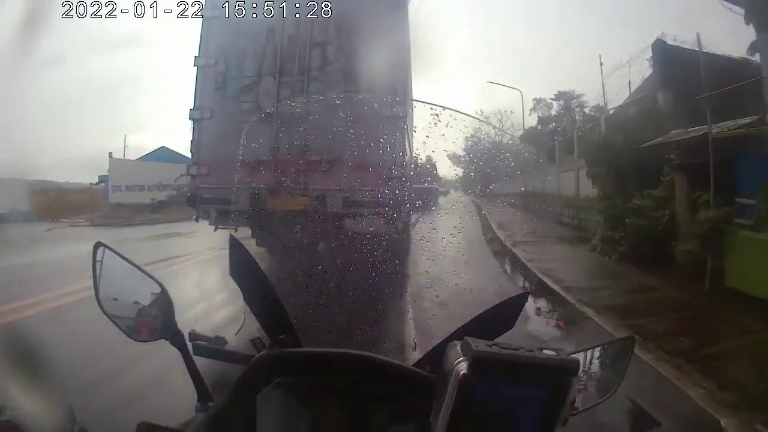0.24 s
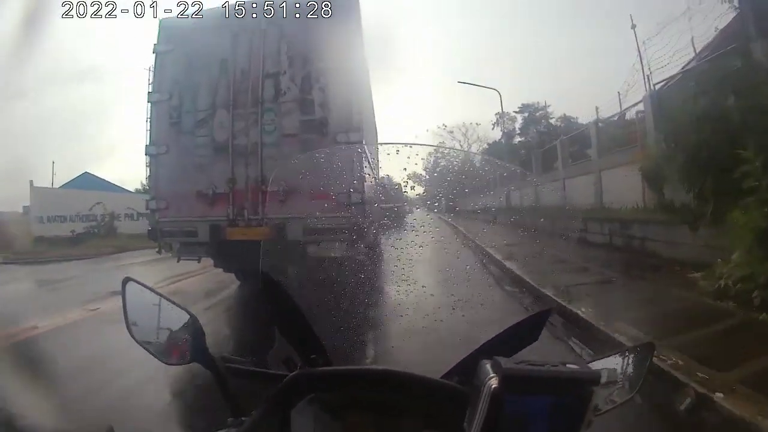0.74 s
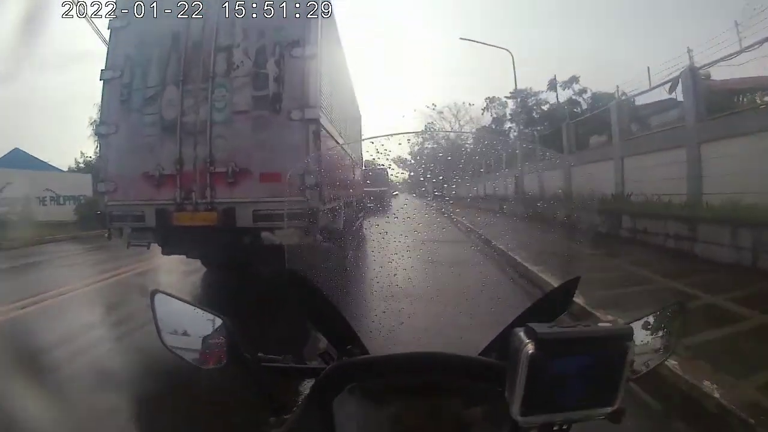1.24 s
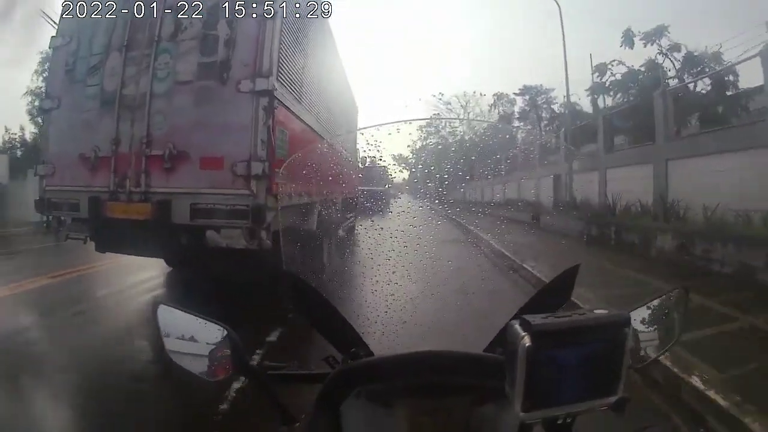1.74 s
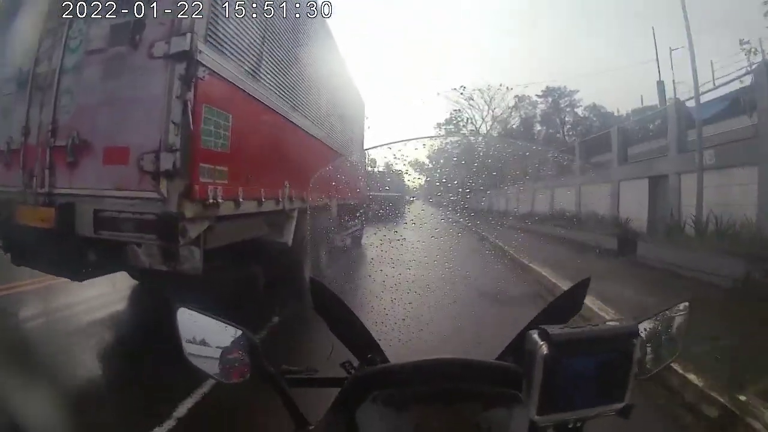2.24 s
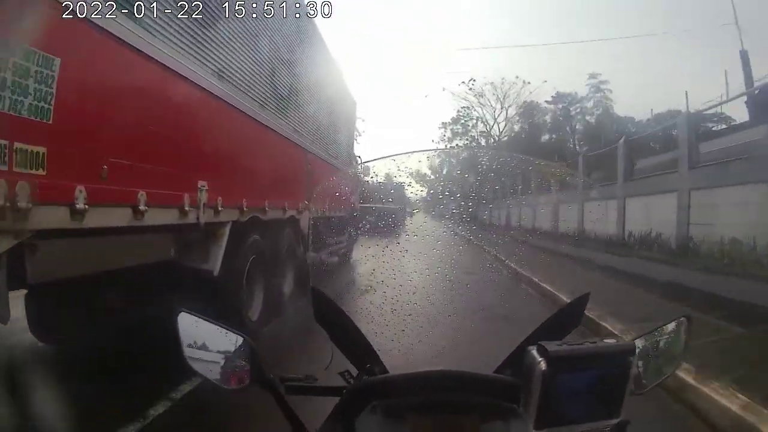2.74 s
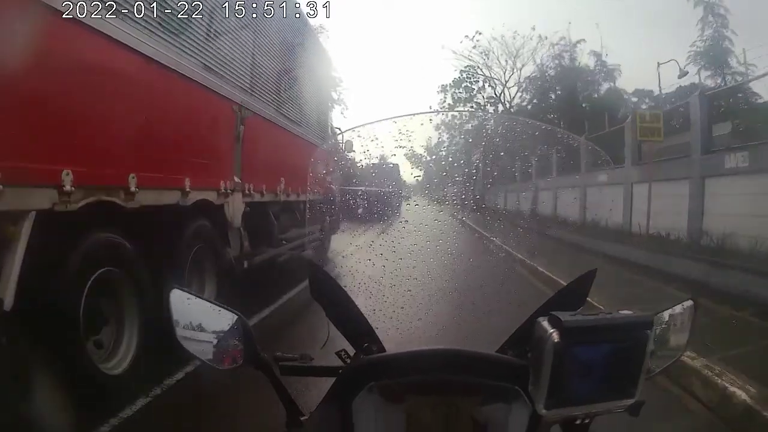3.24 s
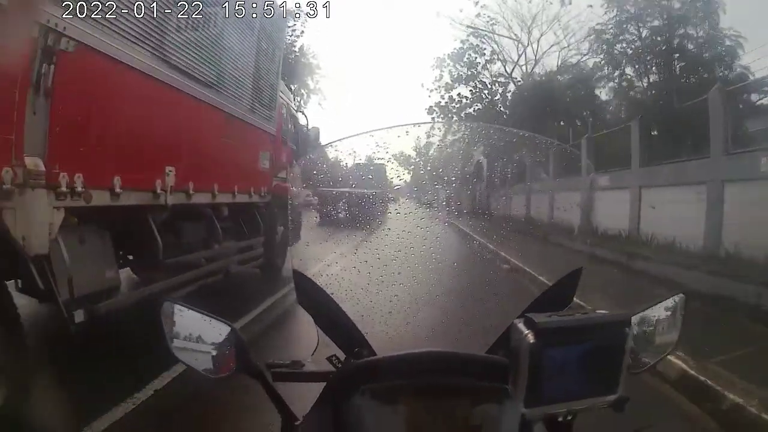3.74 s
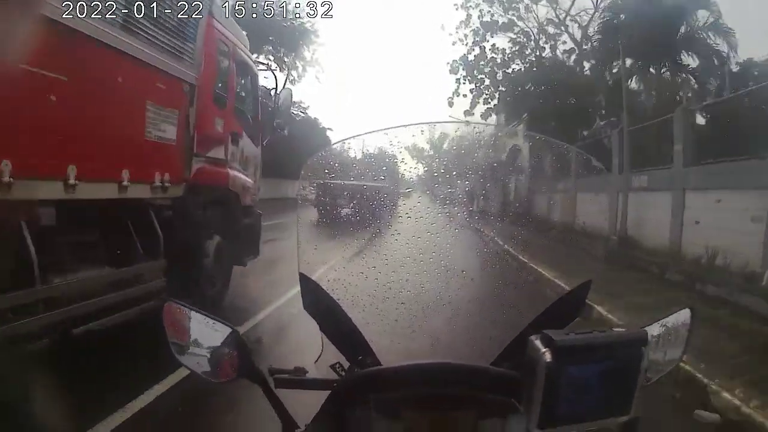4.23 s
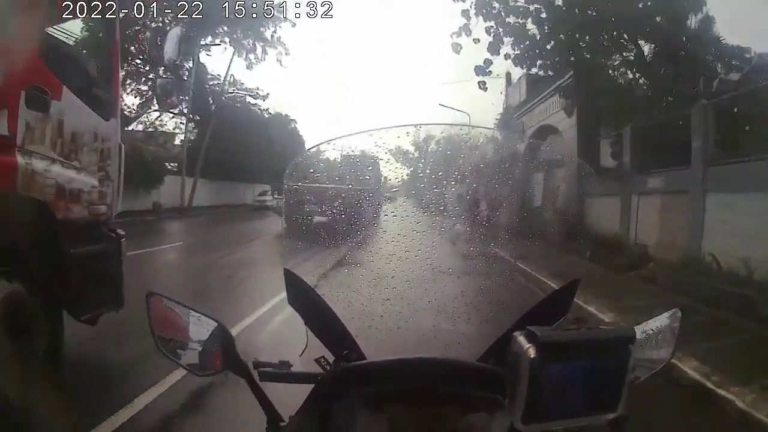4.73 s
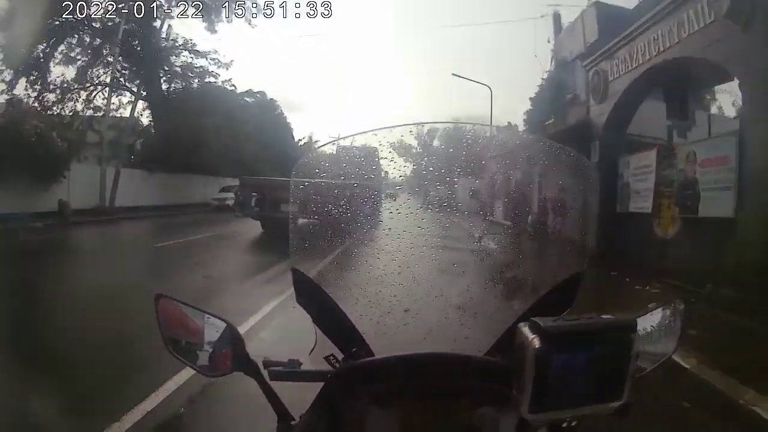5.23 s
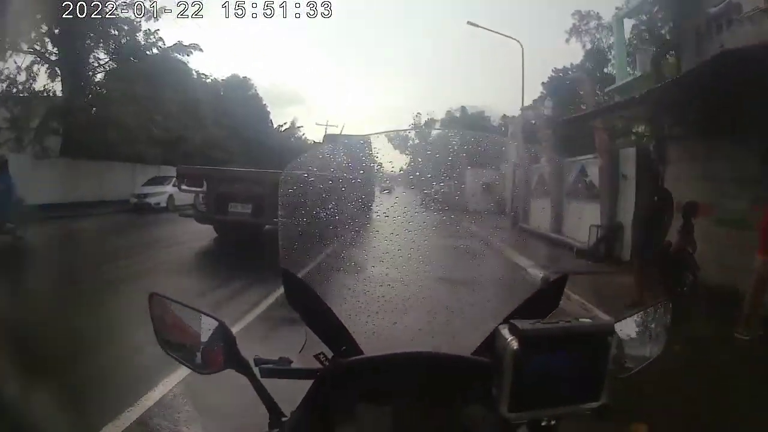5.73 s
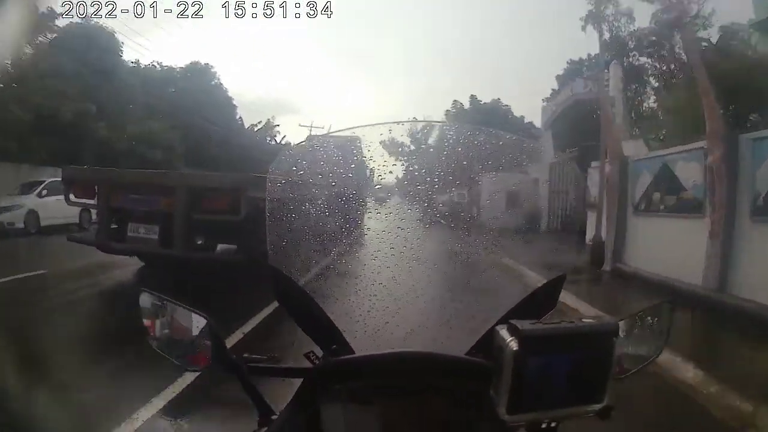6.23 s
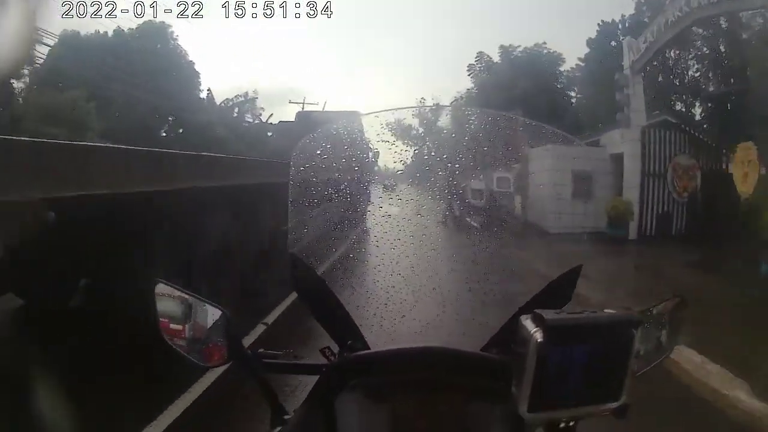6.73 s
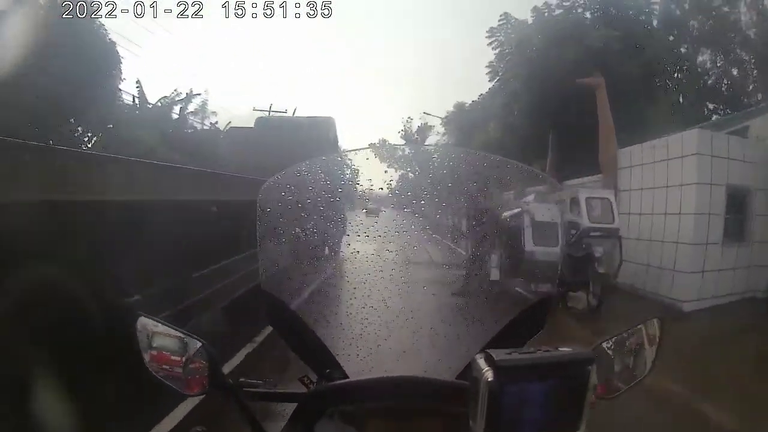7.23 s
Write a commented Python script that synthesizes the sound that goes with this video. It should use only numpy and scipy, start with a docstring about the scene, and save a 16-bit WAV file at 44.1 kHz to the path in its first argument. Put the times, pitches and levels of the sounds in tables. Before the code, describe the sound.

From a microphone on the rider, a single-cylinder motorcycle climbs in pitch, then holds a steady hollow drone. Wind thuds and roars over it in lumpy gusts, so loud the input crackles and flattens. Faint wet tyre hiss lies below. The middle turns rougher and more broken, and late on a twin-toned horn gives three very short toots.

```python
"""A single-cylinder engine drones in gusty wind, both crushed by an overloaded input; wet tyres hiss below.
It is a motorcycle on a wet road, heard from a microphone on the rider; late on, a twin horn toots three times.
Harmonics of the firing rate make the thump and ring the microphone housing; shaped noise makes wind and spray;
the horn is two stacks of sines. The overload squares off the sum, rough noise follows its treble, filters dull it."""
import sys
import numpy as np
from scipy import signal
from scipy.fft import rfft, irfft
from scipy.io import wavfile
from scipy.ndimage import uniform_filter1d

SR = 44100
rng = np.random.default_rng(int(sys.argv[2]) if len(sys.argv) > 2 else 0)


def pcm_store(signal):
    """Save signal as 16-bit PCM."""
    levels = np.round(np.clip(np.atleast_2d(signal), -1, 1) * 32767)
    wavfile.write(sys.argv[1], SR, levels.astype(np.int16).T)


N = 329427


def amp(db):
    """Decibels to a linear gain."""
    return 10 ** (np.asarray(db) / 20)


def evened(x):
    """Bring a signal to rms 1."""
    return x / np.sqrt(np.mean(x ** 2) + 1e-20)


def curves(rows):
    """Draw each column after start_s as a straight-line automation curve, one value per sample."""
    start_s, *columns = np.transpose(rows)
    t = np.arange(N) / SR
    return [np.interp(t, start_s, column) for column in columns]


def noise(spectrum):
    """Steady Gaussian noise shaped to a spectrum, rms 1; frequencies off its ends are cut by 90 dB."""
    hz, db = np.transpose(spectrum)
    bins_hz = np.fft.rfftfreq(N, 1 / SR)
    gain_db = np.interp(np.log(bins_hz + 1), np.log(hz + 1), db, left=-90, right=-90)
    return evened(irfft(rfft(rng.standard_normal(N)) * amp(gain_db), N))


def wobble(hz):
    """Slow random modulation with flat content up to hz, rms 1."""
    return noise([(0, 0), (hz, 0)])


def ring(x, hz, width_hz):
    """A resonance with unity gain at its peak."""
    b, a = signal.iirpeak(hz, hz / width_hz, SR)
    return signal.lfilter(b, a, x)


def tyres():
    """Water thrown off the treads: band-shaped noise whose level flickers at random."""
    # spray level: start_s, level_db
    spray_curve = [(0, -57), (.6, -35.5), (2, -31), (3.5, -33.5), (4.7, -31), (5.8, -32.5), (7.47, -27.5)]
    # spray colour: freq_hz, relative density_db (per Hz)
    spray_spectrum = [(400, -14.5), (800, 4.5), (1400, -5.5), (2100, -7), (2700, -16.5), (3500, -9),
                      (4000, -12.5), (4500, -60.5)]
    level_db, = curves(spray_curve)
    flicker_db = 3.3 * wobble(hz=41.2)
    return amp(level_db + flicker_db) * noise(spray_spectrum)


def wind():
    """Lumpy low pressure swings at the microphone port, and a higher airstream roar that comes in gusts."""
    # airstream round the rider: start_s, buffet_db, roar_db
    airstream = [(0, -23, -25), (.3, -20.5, -20), (.7, -12.5, -15), (1.3, -12, -17), (2.1, -8.5, -11),
                 (2.6, -12.5, -14.5), (3.2, -12, -13), (3.8, -14, -14.5), (4.4, -6.5, -10), (5.1, -5.5, -8),
                 (5.45, -8, -13), (5.8, -10, -17.5), (6.3, -5.5, -6.5), (6.5, -7.5, -10.5),
                 (7.1, -6.5, -13), (7.47, -3, -5)]
    # short rises and dips in the wind: centre_s, lift_db (negative for a dip)
    rises_and_dips = [(.38, 6), (.95, -3), (1.15, 3.5), (1.36, -6), (1.629, 12), (1.71, -15), (1.96, 6),
                      (2.05, 3), (2.45, -5.5), (2.891, 5.5), (3.24, 4.5), (3.45, -2.5), (4.19, 0),
                      (4.71, 7.5), (4.811, 3.5), (5.14, -3.5), (5.31, 0.5), (5.411, 8), (5.45, -10),
                      (5.99, 2), (6.27, 9), (6.41, 7.5), (6.601, 8.5), (6.73, 3), (7.291, 6.5)]
    # low buffeting colour: freq_hz, relative density_db (per Hz)
    buffet_spectrum = [(8, -32), (20, 0), (40, -1.5), (70, -6), (110, -24), (200, -39)]
    # roar colour: freq_hz, relative density_db (per Hz)
    roar_spectrum = [(50, -20.5), (100, 1.5), (200, -6.5), (330, -9), (600, -12), (1000, -32.5),
                     (1600, -37.5)]
    gust_width_s = 0.028  # from the centre to 1/e of the lift
    roar_share = 0.5  # share of the gusts' dB that reaches the roar

    t = np.arange(N) / SR
    buffet_db, roar_db = curves(airstream)
    gusts_db = sum(lift * np.exp(-((t - centre) / gust_width_s) ** 2) for centre, lift in rises_and_dips)
    gusts_db = gusts_db + 0.96 * wobble(hz=4.6)  # slow random gusting
    buffet_gain = amp(buffet_db + gusts_db + 0.87 * wobble(hz=17))
    roar_gain = amp(roar_db + roar_share * gusts_db + 2.72 * wobble(hz=30.7))
    return buffet_gain * noise(buffet_spectrum) + roar_gain * noise(roar_spectrum)


def surges():
    """Brief surges that drive the input harder: the sum of bell-shaped swells, in dB."""
    # surges: centre_s, width_s (centre to 1/e), lift_db
    swells = [(.46, 0.033, 4), (.955, 0.035, 7.5), (1.212, 0.0071, 16.5), (1.652, 0.0096, 6.5),
              (2.0, 0.028, 8), (3.33, 0.055, 4), (4.118, 0.028, 10.5), (4.628, 0.033, 8),
              (5.18, 0.022, 11.5), (5.235, 0.0095, 16), (5.363, 0.017, 10.5), (5.445, 0.012, 16),
              (5.983, 0.0029, 7.5), (6.211, 0.0054, 13), (6.852, 0.1, 6.5), (7.043, 0.004, 18),
              (7.4, 0.052, 5)]
    t = np.arange(N) / SR
    return sum(lift * np.exp(-((t - centre) / width) ** 2) for centre, width, lift in swells)


def horn():
    """Two buzzing diaphragms a third apart; they swing up fast and die away once the button is let go."""
    # button presses: start_s, length_s, level_db
    presses = [(6.32, .045, -4), (6.484, .053, -1.5), (6.64, .055, -1.5)]
    # the two diaphragms: pitch_hz, level_db
    diaphragms = [(422, -9), (504, -4)]
    # partials of each diaphragm: multiple of its pitch, level_db
    partials = [(1, 6), (2, -45.5), (3, -13), (4, -9.5), (5, -31), (6, -29), (7, -44)]

    t = np.arange(N) / SR
    tone = sum(amp(horn_db + partial_db) * np.sin(2 * np.pi * multiple * pitch * t)
               for pitch, horn_db in diaphragms for multiple, partial_db in partials)
    envelope = np.zeros(N)
    for start, length, db in presses:
        rise = np.clip((t - start) / 0.0015, 0, 1)  # full after 1.5 ms
        since_release = np.clip(t - start - length, 0, 1)
        envelope += rise * amp(db - 60 * since_release / 0.064)  # falls 60 dB in 64 ms
    return envelope * tone


def housing(x):
    """The cavity round the microphone rings at its modes, summed with alternating polarity."""
    # modes: freq_hz, width_hz (of each of two passes), level_db
    modes = [(398, 75, 7.5), (501.3, 81.6, 6.5)]
    out = 0
    for k, (hz, width, db) in enumerate(modes):
        twice_rung = ring(ring(x, hz, width), hz, width)
        out = out + (-1) ** k * amp(db) * twice_rung
    return out


def engine():
    """Each firing thumps in the exhaust and rings the housing, with a noisy puff behind it."""
    # throttle: start_s, level_db
    throttle = [(0, -20), (.25, -16), (.5, -15), (1.1, -13.5), (1.6, -9.5), (2.3, -14), (3.85, -10.5),
                (4.0, -20), (4.2, -16), (4.6, -10.5), (5.0, -10), (5.3, -17.5), (5.5, -11), (6.05, -15),
                (6.4, -10), (6.6, -14.5), (6.78, -15.5), (7.03, -16.5), (7.12, -10.5), (7.47, -9)]
    # engine speed: start_s, rate_hz (firings per second)
    firing_rate = [(0, 33.6), (.28, 38.6), (.42, 41), (.7, 43.9), (.98, 45.5), (1.45, 46.3), (1.85, 48.4),
                   (2.5, 48.9), (3.07, 49.8), (3.76, 50.4), (4.2, 50.6), (4.6, 47), (5.3, 48.9),
                   (5.57, 47.5), (6.5, 47.2), (6.83, 49.5), (7.11, 49.6), (7.47, 52)]
    # exhaust thump: multiple of the firing rate, level_db
    thump_orders = [(1, -17), (2, -3.5), (3, -17), (4, -11.5), (5, -19)]
    # smooth at first, raggedest from 4.2 to 5.3 s, then partly ragged:
    # start_s, noise share of the ringing's power (0-1)
    roughness = [(0, .04), (3.9, .12), (4.2, .55), (5.3, .55), (5.5, .3), (7.47, .35)]

    level_db, = curves(throttle)
    rough, = curves(roughness)
    rate_hz, = curves(firing_rate)
    unsteady_hz = rate_hz * (1 + .0015 * wobble(hz=6))
    cycles = np.cumsum(unsteady_hz) / SR  # firings so far

    # every thump order has its own random level
    thump = sum(amp(db + 2.5 * wobble(hz=7.1)) * np.cos(2 * np.pi * order * cycles)
                for order, db in thump_orders)
    pulses = sum(np.cos(2 * np.pi * order * cycles) for order in range(6, 17))
    firings = pulses * amp(1.8 * wobble(hz=27.8))
    # each puff jumps up at the firing and fades through the cycle
    puff_envelope = 0.16 + np.exp(-(cycles % 1) / 0.68)
    puffs = puff_envelope * rng.standard_normal(N)

    clean = evened(housing(firings))
    rattle = evened(housing(puffs))
    ringing = np.sqrt(1 - rough) * clean + np.sqrt(rough) * rattle
    return amp(level_db) * (thump + ringing)


def scene():
    """Mix the ride: surges lift engine and spray in full, wind by less, and leave the horn alone."""
    swell_db = surges()
    ride = amp(swell_db) * (engine() + tyres())
    air = amp(0.46 * swell_db) * wind()
    return (ride + air + horn())[None]


def record(dry):
    """The preamplifier saturates, rough noise joins, a filter rounds corners, the converter clips ripples."""
    # rough noise colour: freq_hz, relative density_db (per Hz)
    rough_spectrum = [(40, -13.5), (400, 5.5), (1000, -3.5), (2000, -10.5), (4000, -17.5)]
    input_hz, edge_hz = 3816, 15700  # cutoffs of the input filter and the final low-pass

    hot, knee = amp(8.0) * dry, 6.5  # a higher knee turns the corner more sharply
    squared = 0.77 * hot / (1 + abs(hot) ** knee) ** (1 / knee)

    # rough noise rises and falls with the treble of the squared sound
    treble = signal.sosfilt(signal.butter(2, 900, "high", fs=SR, output="sos"), squared)
    treble_level = np.sqrt(abs(uniform_filter1d(treble ** 2, 1400)))  # rms over 1400 samples
    rough_noise = amp(-3.5) * treble_level * noise(rough_spectrum)

    input_filter = signal.butter(5, input_hz, fs=SR, output="sos")
    rounded = signal.sosfiltfilt(input_filter, squared + rough_noise)
    clipped = np.clip(rounded, -.7, .72)
    hissing = clipped + amp(-78.5) * rng.standard_normal(N)  # the converter's own faint hiss
    low_pass = signal.firwin(511, edge_hz, window=("kaiser", 9), fs=SR)
    return signal.oaconvolve(hissing, low_pass[None], "same")


dry = scene()
out = record(dry)
pcm_store(out)
```